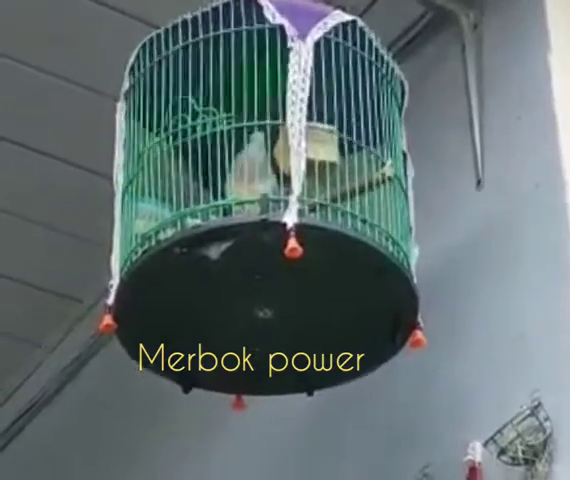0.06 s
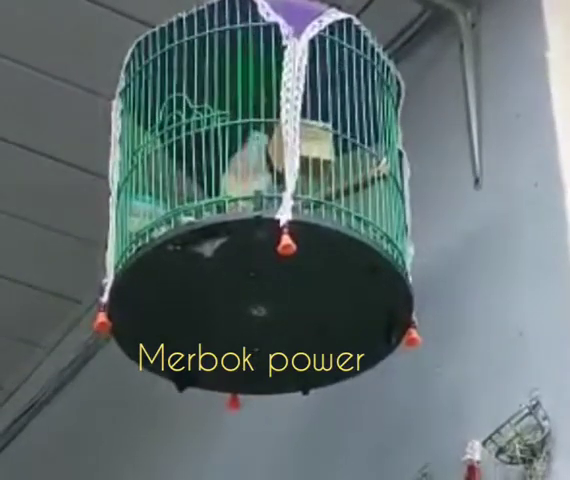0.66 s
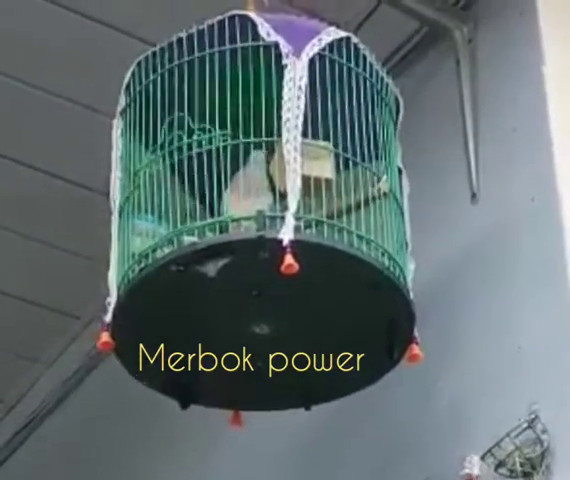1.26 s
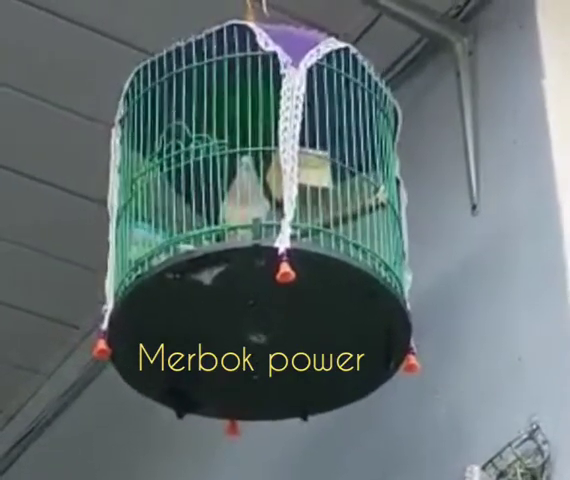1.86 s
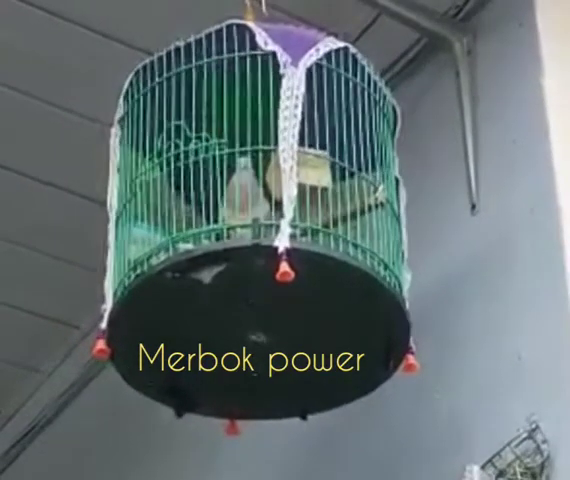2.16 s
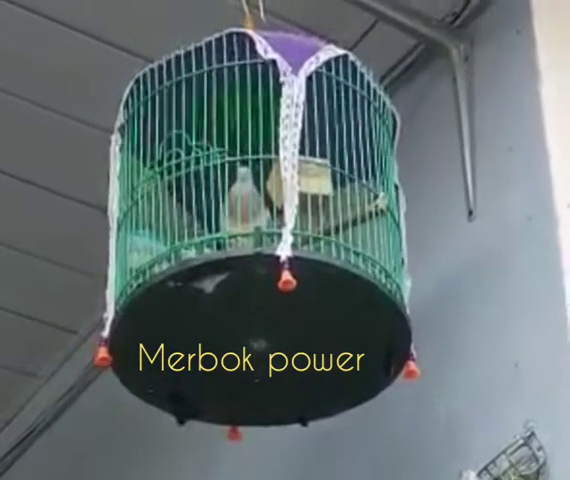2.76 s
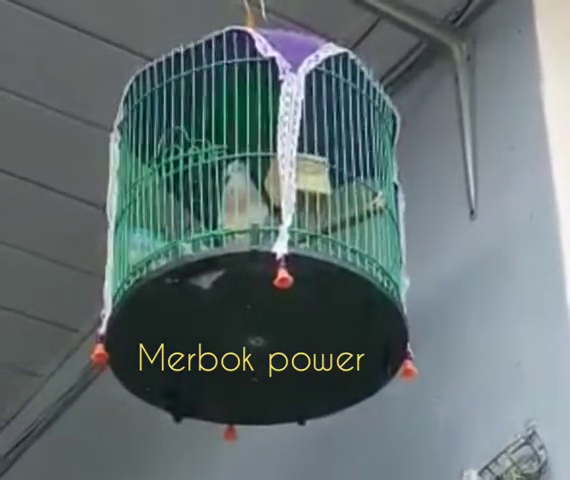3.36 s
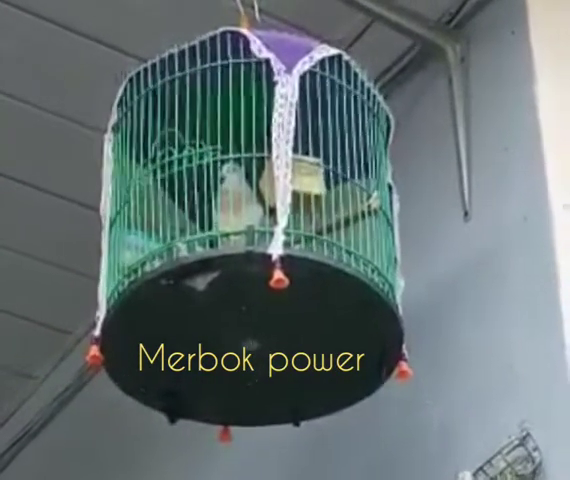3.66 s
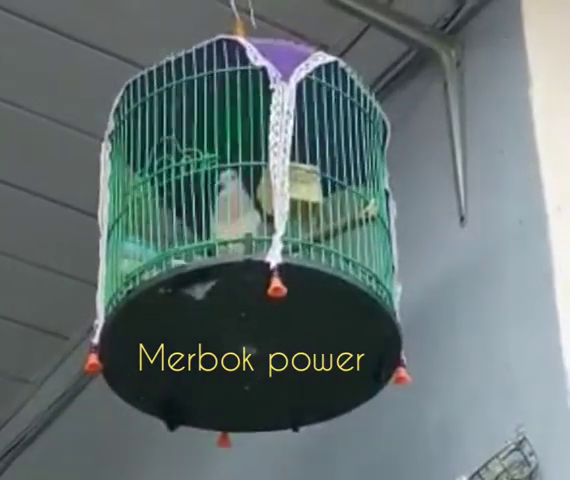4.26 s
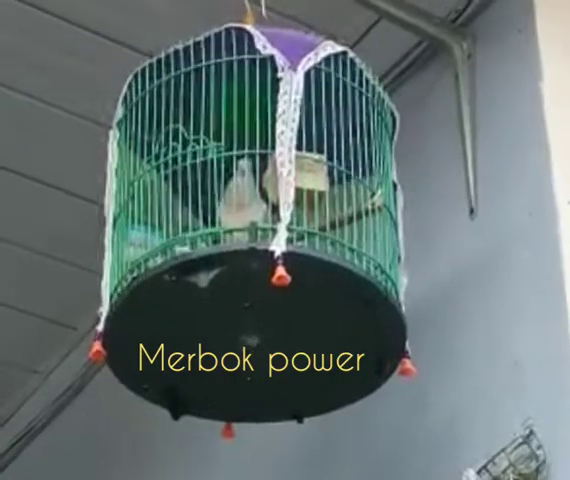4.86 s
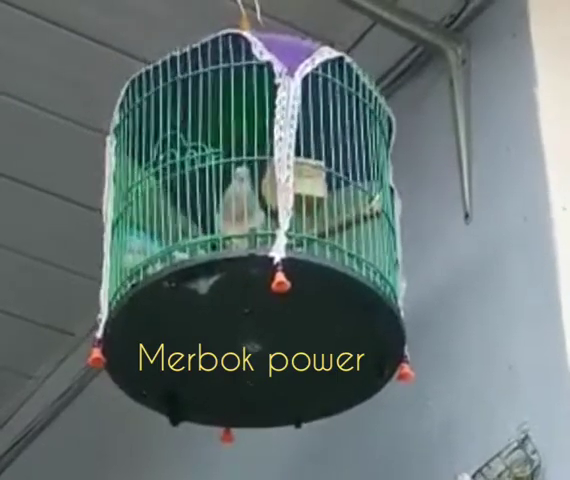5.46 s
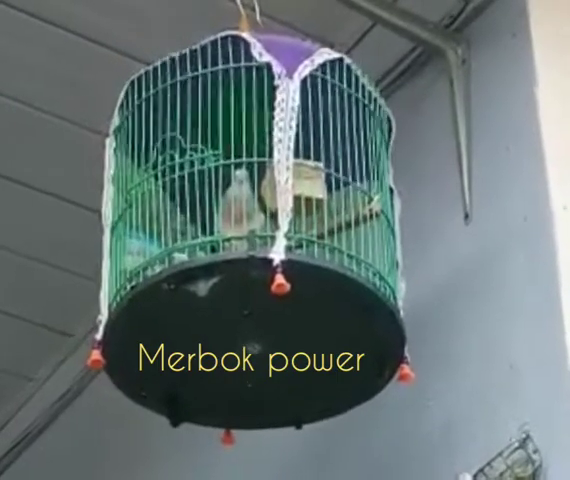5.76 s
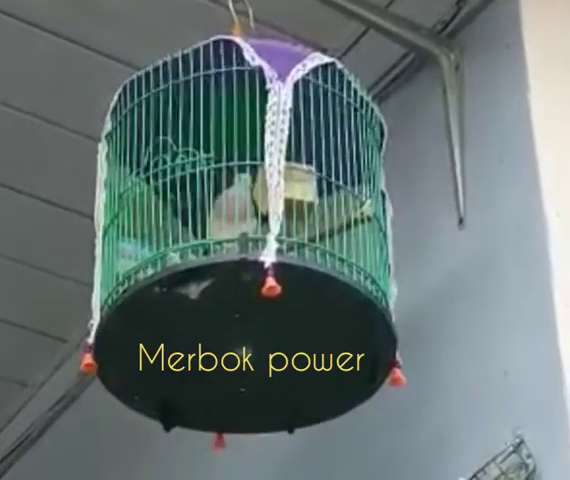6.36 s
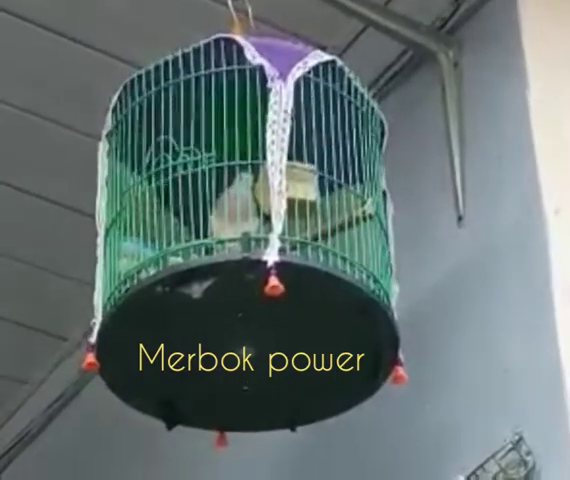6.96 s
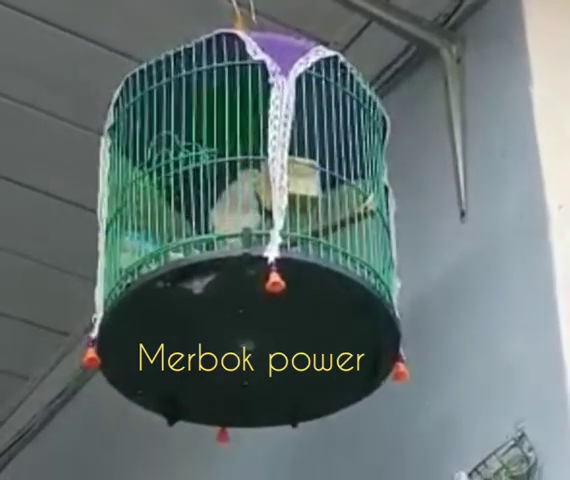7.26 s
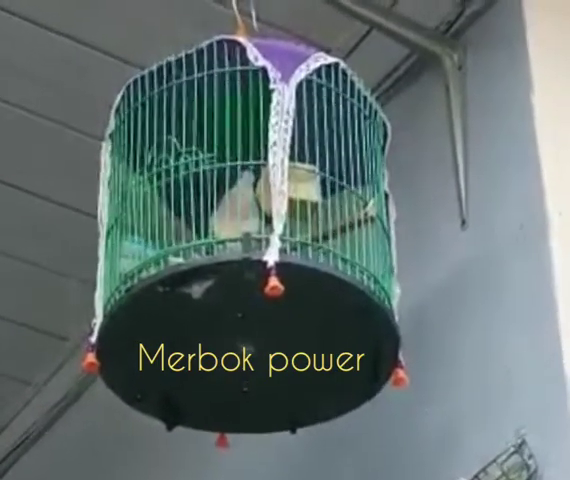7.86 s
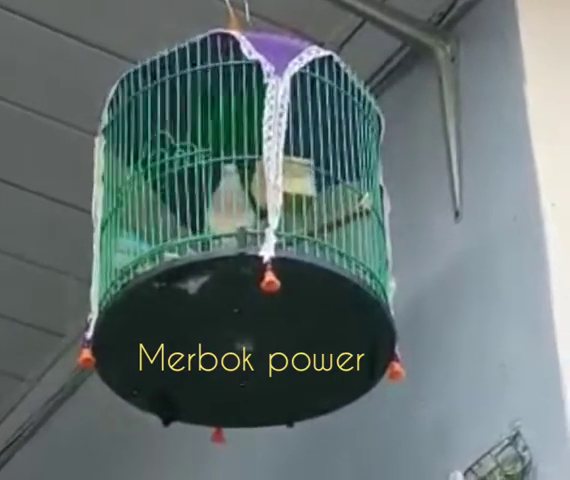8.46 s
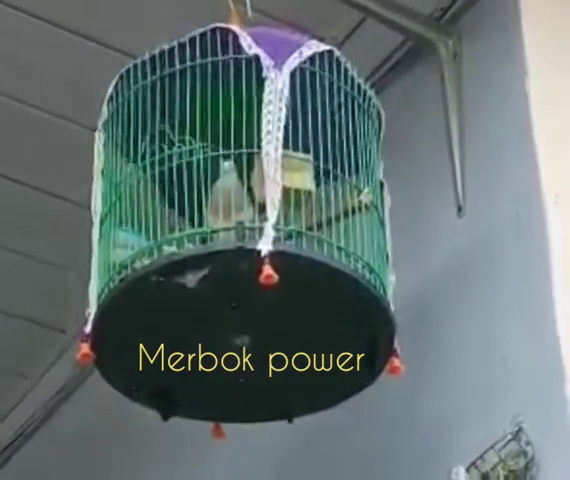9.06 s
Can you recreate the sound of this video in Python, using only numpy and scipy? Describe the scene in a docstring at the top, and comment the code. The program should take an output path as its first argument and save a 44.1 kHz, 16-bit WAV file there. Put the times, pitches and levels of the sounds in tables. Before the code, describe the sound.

A caged dove coos in quick stuttering phrases while other doves answer, with faint rising whistles and one sharp click.

```python
"""Zebra doves coo under a porch roof: one in a hanging cage close by, others answering around it.
Each coo swells in a low register, then sweeps up to a higher tone that sags and slides away;
faint overtones escape the closed beak. Small birds whistle thin rising notes and call hoarsely,
cages rustle and their bars ring with dry clicks. Behind them lie outdoor hiss, a receding
traffic rumble and the swelling hum of one far motor."""
import sys
import numpy as np
from scipy import signal
from scipy.fft import rfft, irfft
from scipy.io import wavfile

SR = 44100
rng = np.random.default_rng(int(sys.argv[2]) if len(sys.argv) > 2 else 0)


def generate_wav(sig):
    """Save sig (samples, or channels by samples) to the path in sys.argv[1] as 16-bit PCM at SR."""
    pcm = np.round(np.clip(np.atleast_2d(sig).T, -1, 1) * 32767).astype(np.int16)
    wavfile.write(sys.argv[1], SR, pcm)


N = 406161
TIME, FREQS = np.arange(N) / SR, np.fft.rfftfreq(N, 1 / SR)


def amp(db):
    """Decibels to gain."""
    return 10 ** (np.asarray(db) / 20)


def unit(x):
    """Scales to rms 1."""
    return x / np.sqrt(np.mean(x ** 2) + 1e-20)


def read(points, hz):
    """Reads a curve on a log-frequency axis."""
    f, value = np.transpose(points)
    return np.interp(np.log(hz + 1), np.log(f + 1), value)


def add(mix, s, sound):
    """Mixes a sound in at time s."""
    part = mix[max(round(s * SR), 0):][:len(sound)]
    part += sound[:len(part)]


def noise(eq, size):
    """Noise shaped by an EQ curve."""
    gain = amp(read(eq, np.fft.rfftfreq(size, 1 / SR)))
    return unit(irfft(rfft(rng.standard_normal(size)) * gain, size))


def band(hz, width_hz, size):
    """Noise in one resonance; centred on zero it is a slow random drift."""
    detune = 2 * (np.fft.rfftfreq(size, 1 / SR) - hz) / width_hz
    return unit(irfft(rfft(rng.standard_normal(size)) / np.sqrt(1 + detune ** 4), size))


def placed(x, pan_db, bearing=20):
    """Pans a source: bearing degrees to the left, it reaches that side sooner; pan_db is L minus R."""
    lag_s = .13 * np.sin(np.radians(bearing)) / 343
    delays = np.exp(1j * np.pi * lag_s * np.outer([1, -1], FREQS))
    return irfft(rfft(x) * delays, N) * amp([[pan_db / 2], [-pan_db / 2]])


# Stereo image of the beds: (frequency [Hz], left-right correlation [-1..1])
BED_CORRELATION = [(30, 0.98), (120, 0.9), (300, 0.8), (700, 0.56), (2000, -0.0069), (5000, -0.11),
                   (14000, 0.12)]
def wide(eq):
    """Diffuse stereo noise, nearly mono in the bass."""
    same = read(BED_CORRELATION, FREQS)
    left, other = noise(eq, N), noise(eq, N)
    return np.array([left, irfft(same * rfft(left) + np.sqrt(1 - same ** 2) * rfft(other), N)])


# Reverb decay: (frequency [Hz], t60 [s])
PORCH_DECAY = [(200, 0.95), (1000, 0.47), (4000, 0.3), (12000, 0.2)]
def porch(x, correlation=.3, predelay_s=.0043, clump_db=3):
    """Clumped reflections from roof and walls, each band dying at its own speed."""
    taps = rng.standard_normal((2, SR)) * (np.arange(SR) > predelay_s * SR)
    taps *= amp(clump_db * band(0, 160, SR))
    taps[1] = correlation * taps[0] + np.sqrt(1 - correlation ** 2) * taps[1]
    hz, t, bands = signal.stft(taps, SR, nperseg=256)
    tail = signal.istft(bands * amp(-60 * t / read(PORCH_DECAY, hz)[:, None]), SR, nperseg=256)[1]
    return signal.fftconvolve(x[None], tail / np.linalg.norm(tail[0]), axes=1)[:, :N]


# Air bed EQ: (frequency [Hz], gain [dB])
AIR_EQ = [(25, -6), (113, -2.5), (160, -10), (380, -10.5), (650, -10), (1150, -7.5), (1600, -14.5),
          (4600, -18.5), (5700, -25), (7300, -25), (8500, -31), (11000, -30), (13000, -41.5),
          (15500, -50.5)]
# Air bed pan: (frequency [Hz], left minus right [dB])
AIR_PAN = [(60, -1), (110, -0.5), (200, -0.5), (380, 1.5), (700, 0.5), (1290, -3), (2380, -4.0),
           (4400, -3.5), (8120, -2), (15000, 0.5)]
def outdoor_air(level_db=-55, drift_db=1.5):
    """A wide bed of hiss whose level wavers."""
    balance = amp(np.outer([.5, -.5], read(AIR_PAN, FREQS)))
    return amp(level_db + drift_db * band(0, 12, N)) * irfft(rfft(wide(AIR_EQ)) * balance, N)


# Traffic EQ: (frequency [Hz], gain [dB])
RUMBLE_EQ = [(25, -9.5), (50, 1), (75, 4.5), (130, 1), (200, -3), (330, -7.5), (500, -52), (900, -42.5)]
# Motor harmonics from the first up: (relative level [dB])
MOTOR_HARMONICS = [-4.5, 0, -24.5, -16.5, -19.5]
# Motor revs: (peak time [s], length [s], firing rate [Hz], glide [Hz/s], level [dB])
MOTOR_REVS = [(0.016, 0.44, 89.2, -19, -52), (1.15, 1.68, 73.77, 15, -50), (4.898, 1.4, 54.8, 3, -59),
              (6.281, 0.39, 56.9, -6.5, -50.5), (7.101, 1.02, 57.17, 7.5, -53.5),
              (8.033, 0.27, 66.2, 8, -51), (8.55, 0.53, 70.46, 3.5, -45.5)]
def traffic(start_db=-53.5, fade_db_per_s=1, rev_rumble_db=-6, waver=.012):
    """Slowly receding rumble and one far motor, whose revs swell both its hum and the rumble."""
    hum, swells = np.zeros((2, N))
    for s, length, firing_hz, glide, db in MOTOR_REVS:
        swell = amp(db) * np.exp(-(2 * (TIME - s) / length) ** 2)
        hz = (firing_hz + glide * (TIME - s)) * (1 + waver * band(0, 12, N))
        phase = 2 * np.pi * np.cumsum(hz) / SR
        hum += swell * unit(sum(amp(h) * np.sin(k * phase) for k, h in enumerate(MOTOR_HARMONICS, 1)))
        swells += swell
    rumble_gain = np.hypot(amp(start_db - fade_db_per_s * TIME), amp(rev_rumble_db) * swells)
    return hum + rumble_gain * wide(RUMBLE_EQ)


# Rustle EQ: (frequency [Hz], gain [dB])
RUSTLE_EQ = [(1000, 3.5), (2000, -1), (3700, 0), (5500, -3), (7200, -5), (8500, -8.5), (10800, -6.5),
             (13000, -15.5), (15500, -30.5)]
# Rustle cues: (time [s], length [s], rustle level [dB], thump level [dB])
RUSTLE_CUES = [(2.219, 0.05, -44.5, -73), (2.303, 0.025, -42.5, -78.5), (2.326, 0.039, -33.5, -44.5),
               (2.383, 0.063, -47, -47), (4.632, 0.062, -54.5, -72), (4.783, 0.095, -46.5, -52.5),
               (2.996, 0.16, -56, -60), (8.29, 0.12, -63, -74)]
def cage_rustles(grain_db=3, attack_share=.12, reverb_db=-3, thump_reverb_db=-6.5):
    """Grainy rustles in the cages, each over a soft low thump."""
    rustles, thumps = np.zeros((2, N))
    t = TIME[:SR // 2]
    for s, length, db, thump_db in RUSTLE_CUES:
        envelope = np.minimum(t / (attack_share * length), 1) * np.exp(-(t / length) ** 2)
        grains = unit(noise(RUSTLE_EQ, len(t)) * amp(grain_db * band(0, 870, len(t))))
        add(rustles, s, envelope * amp(db) * grains)
        add(thumps, s, envelope * amp(thump_db) * band(310, 200, len(t)))
    low_end = thumps + amp(thump_reverb_db) * porch(thumps)
    return low_end + placed(rustles + amp(reverb_db) * porch(rustles), pan_db=-3, bearing=56)


# EQ of the dry transient: (frequency [Hz], gain [dB])
CRACK_EQ = [(400, -22), (1500, -10), (2600, -9.5), (4100, 6.5), (5500, 0.5), (8500, -8), (13000, -9.5),
            (15500, -22.5)]
# Cage bar modes: (frequency [Hz], relative level [dB], t60 [s])
BAR_MODES = [(2830, -16.5, .029), (4030, -2, .022), (4120, -2, 0.028), (4226, -4, 0.02),
             (4980, -4.5, 0.035), (7130, -7, 0.024), (10000, -15, .008), (11700, -17.5, .01)]
# Click cues: (time [s], level [dB], tilt of the ring [dB/octave])
CLICK_CUES = [(.845, -48, 12), (2.304, -39, 7.5), (2.909, -50.5, 18), (2.923, -42, 16), (3.272, -53, -20),
              (4.701, -61, 21), (5.851, -56, 13), (5.936, -24.5, -3), (6.090, -46.5, 15.5), (6.094, -46, 6),
              (6.101, -50, 1), (6.405, -64, 24), (8.217, -51.5, 9)]
def cage_clicks(ticks_per_s=4, tick_db=-63, spread_db=4.5, crack_t60=.014, reverb_db=-7):
    """Dry clicks ring the bars, with faint random ticks as the birds shift their feet."""
    out, t = np.zeros(N), TIME[:SR // 2]
    draws = rng.random((int(ticks_per_s * N / SR), 3))
    ticks = [(when * N / SR, tick_db + spread_db * (2 * force - 1), 10 * bright)
             for when, force, bright in draws]
    for s, db, tilt in CLICK_CUES + ticks:
        click = noise(CRACK_EQ, len(t)) * amp(-60 * t / crack_t60)
        for hz, mode_db, t60 in BAR_MODES:
            detuned_hz = hz * rng.uniform(.95, 1.03)  # no two bars alike
            ring = np.sin(2 * np.pi * (detuned_hz * t + rng.random())) * amp(-60 * t / t60)
            click += amp(mode_db + tilt * np.log2(hz / 4000)) * ring
        add(out, s, amp(db) * click * np.minimum(t / .002, 1))
    return placed(out + amp(reverb_db) * porch(out), pan_db=-6, bearing=56)


# Squawk automation: (time [s], pitch [Hz], level [dB], roughness [0..1])
SQUAWK_CURVES = [(8.87, 597, -47.5, 0.8), (8.915, 715, -38.5, 0.7), (8.945, 896, -47.5, 0.6),
                 (8.97, 960, -49.5, 0.17), (9.0, 1010, -44, 0.1), (9.02, 1100, -56, 0),
                 (9.035, 1094, -63, 0.3)]
# Squawk harmonics from the second up: (relative level [dB])
SQUAWK_HARMONICS = [10, -9, -22, -22, -16, -19.5, -14.5]
# Short call cues: (time [s], length [s], centre [Hz], bandwidth [Hz], level [dB])
# The cue at 8.657 s is a brief breathy coo-like note near 1060 Hz.
SHORT_CALL_CUES = [(0.973, 0.13, 2940, 700, -56), (1.222, 0.086, 2140, 404, -51.5),
                   (3.116, 0.11, 3560, 1100, -52.5), (3.727, 0.074, 1500, 900, -51.5),
                   (0.905, 0.067, 755, 100, -58), (1.296, 0.063, 705, 140, -53.5),
                   (3.417, 0.082, 690, 89.5, -56), (3.717, 0.084, 398, 138, -58.5),
                   (8.082, 0.14, 1810, 495, -59.5), (8.608, 0.058, 1720, 350, -55.5),
                   (8.657, 0.067, 1064, 118, -43.5), (9.056, 0.033, 1270, 304, -40),
                   (9.125, 0.036, 1165, 456, -36.5)]
def hoarse_calls(jitter=.087, reverb_db=-6):
    """A squawk that clears as it rises, and short breathy calls farther off."""
    out = np.zeros(N)
    times, *lanes = np.transpose(SQUAWK_CURVES)
    t = np.arange(times[0], times[-1], 1 / SR)
    hz, db, rough = (np.interp(t, times, lane) for lane in lanes)
    phase = 2 * np.pi * np.cumsum(hz * (1 + jitter * rough * band(0, 500, len(t)))) / SR
    squawk = unit(sum(amp(h) * np.sin(k * phase) for k, h in enumerate(SQUAWK_HARMONICS, 2)))
    add(out, times[0], amp(db) * squawk)
    for s, length, hz, width, db in SHORT_CALL_CUES:
        size = int(length * SR)
        add(out, s, amp(db) * band(hz, width, size) * signal.windows.tukey(size, .7))
    return placed(out + amp(reverb_db) * porch(out), pan_db=-6)


# Whistle cues: (time [s], length [s], start [Hz], top [Hz], glide curve [exponent, under 1 rises early],
# vibrato [share of pitch], end drop [share of pitch], loudest at [share of climb], pre-trim level [dB])
WHISTLE_CUES = [(0, 0.074, 4800, 4980, 1.6, .0042, .022, 1, -57.5),
                (1.346, .755, 3716, 5336, 0.66, 0.0062, 0.081, 0.79, -56.5),
                (1.776, 0.19, 3800, 4290, .9, 0.0042, .075, 0.94, -60.5),
                (4.221, .37, 3880, 4940, 1, .013, .03, 0.7, -58),
                (6.09, .37, 4270, 5140, 1.26, .012, .01, 1, -67),
                (6.237, 1.11, 3462, 5010, 1.14, 0.0072, .05, 1, -57),
                (6.98, .62, 3880, 5750, 1, .024, .02, 0.66, -57),
                (7.25, 0.66, 3960, 5400, 0.78, 0.007, 0.059, 1, -57.5),
                (7.286, .12, 4400, 4630, .94, .005, .011, 1, -58)]
def whistles(drop_s=.06, vibrato_hz=8, swell_db=8.5, flutter_db=4.5, trim_db=-4, reverb_db=-4):
    """Thin, nearly pure glides of small birds: each climbs, swells and wavers more, then drops off."""
    out = np.zeros(N)
    for s, length, start_hz, top_hz, curve, depth, drop_share, loudest, db in WHISTLE_CUES:
        t = np.arange(0, length, 1 / SR)
        climb = np.minimum(t / max(length - drop_s, length / 2), 1)
        drop = np.clip(1 - (length - t) / drop_s, 0, 1)
        hz = (start_hz + (top_hz - start_hz) * climb ** curve) * (1 - drop_share * drop ** 2)
        jitter = .004 * band(0, 70, len(t))
        wander = .011 * climb * band(6, 10, 2 * SR)[:len(t)]
        vibrato = depth * np.sqrt(climb) * np.sin(2 * np.pi * (vibrato_hz * t + rng.random()))
        phase = 2 * np.pi * np.cumsum(hz * (1 + jitter + wander + vibrato)) / SR
        tone = np.sin(phase) + amp(-26.5) * np.sin(2 * phase)
        shape_db = flutter_db * band(0, 46, len(t)) - swell_db * (1 - climb / loudest) ** 2
        add(out, s, amp(db + trim_db + shape_db) * signal.windows.tukey(len(t), .1) * tone)
    return placed(out + amp(reverb_db) * porch(out), pan_db=-10, bearing=0)


# Voice presets: (scoop pitch [Hz], scoop rise [share of pitch], scoop swell [dB], upward sweep [s],
# tone sag [Hz], long-note slide [Hz], slide time [s], long-note fade [dB])
DOVE_VOICES = {"near": (855, .06, 4.1, 0.0045, 28.4, 170, .03, 4.5),
               "deep": (858, 0.058, 10.1, 0.0042, 42.1, 79, 0.046, 4.3),
               "bright": (965, .13, 9, .003, 49.6, 138.6, 0.0706, 4),
               "soft": (891, 0.02, 0.5, 0.01, 26, 141.5, 0.04, -0.5),
               "high": (1200, 0.24, 3, 0.0028, 40, 25, 0.013, 1),
               "plain": (1058, .02, 3, .01, 3.5, 3.5, .04, 0),
               "low": (840, 0.018, 6.6, .01, 35, 16, 0.033, 2.5),
               "far": (1230, .06, 6, .005, 22, 30, 0.036, 3)}
# Pitch waver per voice: (rms depth [Hz])
DOVE_WAVER = {"near": 6, "deep": 9, "bright": 13, "soft": 9, "high": 24, "plain": 3, "low": 24, "far": 30}
# Standing waves at each perch lift or swallow a passing glide: (centre [Hz], width [Hz], gain [dB])
STANDING_WAVES = {"near": (915, 76, 5.4), "deep": (878, 36, 2.4), "bright": (1140, 26, -7.5),
                  "soft": (1022, 10, 2.65), "high": (1365, 40, 0.85), "plain": (1060, 30, 0),
                  "low": (848, 42, 0.92), "far": (1270, 50, 0)}
# Overtones that escape the closed beak: (multiple of the pitch [ratio])
BEAK_OVERTONES = [2, 3, 4, 5, 6, 10]
# Throat colour on those overtones: (frequency [Hz], gain [dB])
THROAT_EQ = [(1750, -42.5), (2050, -36.5), (2250, -51), (2800, -52.5), (3080, -38.5), (3280, -55),
             (4300, -56), (5300, -62.5), (5900, -49), (6450, -48), (7000, -59), (10800, -59.5)]
# Husk around a scoop at 846 Hz, transposed for each voice: (frequency [Hz], gain [dB])
HUSK_EQ = [(480, -50.5), (660, -19), (790, 1), (900, -3), (1150, -52.5), (3000, -100)]
def coo(voice, note, overtones_db, sixth_db, attack_s=.01, release_s=.016, long_s=.12, husk_db=-19.5):
    """One glide: a low scoop swells, the voice flips up to a tone, sags, and slides down as it closes."""
    scoop_s, scoop_db, tone_s, tone_hz, tone_db = note
    scoop_hz, rise, swell_db, sweep_s, sag_hz, slide_hz, slide_s, fade_db = DOVE_VOICES[voice]
    node_hz, node_width_hz, node_db = STANDING_WAVES[voice]
    t = np.arange(-scoop_s, tone_s + release_s, 1 / SR)  # zero at the flip
    through_scoop, through_tone = np.minimum(1 + t / scoop_s, 1), np.clip(t / tone_s, 0, 1)
    upper = .5 + .5 * np.tanh(t / sweep_s)  # crossfade between registers
    spent = min(tone_s / long_s, 1) ** 2  # a long note runs out of air: it fades and slides in full
    slide = np.clip(1 + (t - tone_s - release_s / 2) / min(slide_s, tone_s), 0, 1) ** 2
    low_hz = scoop_hz * (1 + rise * (through_scoop - .5))
    high_hz = tone_hz - sag_hz * through_tone - slide_hz * (.15 + .85 * spent) * slide
    hz = (1 - upper) * low_hz + upper * high_hz
    low_db = scoop_db - swell_db * (1 - through_scoop)
    high_db = tone_db - fade_db * spent * through_tone ** 2
    envelope = np.sqrt(2) * amp((1 - upper) * low_db + upper * high_db)
    envelope *= np.sin(np.pi / 2 * np.minimum((t + scoop_s) / attack_s, 1)) ** 2
    envelope *= np.sin(np.pi / 2 * np.minimum((t[-1] - t) / release_s, 1)) ** 2
    lift_db = node_db / (1 + (2 * (hz - node_hz) / node_width_hz) ** 2)
    flutter_db = 1.1 * band(0, 100, len(t))
    phase = 2 * np.pi * np.cumsum(hz + DOVE_WAVER[voice] * band(0, 160, len(t))) / SR
    overtones = sum(amp(read(THROAT_EQ, k * hz) + overtones_db + sixth_db * (k == 6)) * np.sin(k * phase)
                    for k in BEAK_OVERTONES)
    husk = amp(husk_db) * (1 - upper) * noise(np.multiply(HUSK_EQ, [scoop_hz / 846, 1]), len(t))
    shimmer = amp(3 * band(0, 83, len(t)))
    return envelope * (amp(lift_db + flutter_db) * np.sin(phase) + shimmer * overtones + husk)


# Mix per voice: (left minus right [dB], reverb send [dB], overtone trim [dB], # sixth-partial trim [dB], shift
# per copy [s; negative leaves the copies unshifted, on the song])
VOICE_MIX = {"near": (-1.6, -6, 0, -0.5, 0.22), "deep": (2.5, -4.5, -0.5, 11, -0.07),
             "bright": (-0.11, -0.87, -1.5, 0, .021), "soft": (1.2, 1.5, -8, 0, 0.26),
             "high": (-2.5, 2.5, -23, -0.5, -0.6), "plain": (-2.5, -10, -11, 1, 0.04),
             "low": (0, 7, -21.5, 0, 0.5), "far": (0, 6.5, -18, 2, -1.5)}
# Direction per voice: (angle to the left [degrees])
VOICE_BEARINGS = {"near": 56, "deep": 7, "bright": -12, "soft": 15, "high": -8, "plain": -20, "low": 10,
                  "far": 0}
# Note cues per voice: (time of the register flip [s], scoop length [s], scoop level [dB],
# tone length [s], tone pitch [Hz], tone level [dB])
# "low" at 5.179 s is a low lingering ring after the last coo of the deep dove's phrase;
# "plain" at 5.790 s is a held level tone continuing the near dove's short coo.
NOTE_CUES = { "near": [(2.166, 0.031, -18.5, 0.11, 1103, -19), (2.364, 0.029, -18.5, 0.023, 1000, -27.5),
             (2.461, .028, -20.5, 0.022, 1004, -28.5), (2.557, .028, -19, 0.022, 1034, -25),
             (2.675, 0.029, -20.5, 0.085, 1029, -23), (5.355, .006, -44, 0.02, 1140, -31),
             (5.397, .03, -20.5, .14, 1098, -20), (5.579, 0.027, -20.5, 0.019, 1005, -28),
             (5.675, 0.027, -20.5, 0.02, 1019, -28.5), (5.771, .028, -20, .024, 1035, -26),
             (5.887, .026, -20.5, 0.088, 1034, -22.5), (8.788, 0.035, -21, .14, 1097, -20),
             (8.967, 0.022, -18.5, 0.058, 1035, -22), (9.058, .026, -20, 0.019, 1025, -25.5),
             (9.154, 0.027, -20, 0.031, 1024, -25)], "deep": [(1.872, .058, -20, .12, 1038, -30),
             (2.012, .033, -22.5, 0.031, 946, -30.5), (2.084, 0.037, -30.5, .015, 886, -31.5),
             (2.297, 0.032, -21.5, 0.021, 1013, -20), (4.574, 0.077, -22.5, 0.11, 1005, -31.5),
             (4.705, .035, -24, 0.033, 920, -31), (4.783, 0.029, -24.5, 0.009, 870, -30.5),
             (4.896, 0.049, -23, 0.018, 896, -31), (5.025, 0.036, -23.5, .11, 959, -29.5),
             (7.706, .062, -21.5, .11, 1000, -30.5), (7.832, 0.04, -23.5, .019, 933, -30),
             (7.894, 0.029, -26, 0.0099, 900, -36.5), (7.992, .038, -24, 0.012, 907, -34),
             (8.108, 0.045, -22, 0.058, 926, -26.5)], "bright": [(3.808, 0.037, -27, 0.12, 1233, -25.5),
             (3.952, .03, -26.5, 0.053, 1173, -29), (4.043, 0.024, -23.5, 0.044, 1179, -32),
             (4.150, 0.028, -27, 0.18, 1173, -24), (4.492, .026, -29, .19, 1174, -27),
             (7.398, 0.027, -29, 0.13, 1213, -27.5), (7.535, .028, -30, .035, 1182, -31),
             (7.618, 0.024, -29, .04, 1172, -29), (7.745, 0.02, -31.5, 0.19, 1165, -27),
             (8.108, 0.027, -33, .165, 1172, -28.5)], "soft": [(.162, .024, -35.5, .065, 1060, -37.5),
             (.256, .012, -47, 0.17, 1061, -35.5), (6.112, .016, -26.5, .024, 1058, -35),
             (6.268, .016, -28, 0.019, 1073, -33.5), (6.433, .016, -29.5, 0.071, 1064, -36.5),
             (6.657, 0.019, -32, 0.25, 1044, -37.5), (6.925, .015, -44, 0.049, 989, -41)],
             "high": [(.361, 0.019, -37, .13, 1473, -40.5), (.503, 0.016, -37, 0.04, 1400, -37),
             (.590, 0.014, -39, 0.042, 1385, -37), (.688, .012, -43, 0.074, 1390, -36.5),
             (1.388, .02, -38, 0.078, 1459, -39.5), (1.485, 0.022, -41, 0.049, 1410, -38),
             (1.580, .02, -37.5, 0.04, 1398, -38), (1.671, .018, -39, .075, 1402, -38),
             (1.855, 0.019, -44, 0.068, 1395, -40), (2.520, 0.019, -43, 0.13, 1445, -44.5),
             (2.705, .018, -47.5, .05, 1384, -41.5), (2.810, .018, -46, 0.07, 1386, -38.5),
             (4.762, 0.017, -42, 0.12, 1450, -42), (4.888, .018, -42, 0.048, 1392, -39),
             (4.992, .018, -43, 0.037, 1370, -40.5), (5.098, 0.017, -39.5, 0.071, 1377, -38.5)],
             "plain": [(.005, 0.0055, -37, 0.04, 1047, -38.5), (.705, .028, -43, 0.11, 1087, -37.5),
             (1.001, 0.032, -44.5, .09, 1070, -40.5), (1.150, 0.049, -40.5, 0.047, 1064, -35.5),
             (1.383, .03, -38.5, 0.199, 1058, -37), (1.784, 0.031, -42, .057, 1052, -35.5),
             (5.790, .01, -39, 0.1, 1088, -28.5)], "low": [(5.179, .045, -40, .2, 833, -37.5),
             (8.58, .055, -34, .18, 873, -37.5)], "far": [(5.96, .022, -64, .1, 1287, -57),
             (6.31, .021, -62, 0.055, 1285, -59), (6.49, .02, -62, .05, 1270, -60),
             (6.83, .017, -62, .14, 1314, -57), (7.12, .02, -53, 0.26, 1263, -59)]}
def doves(copy_db=-14):
    """Doves sing from their perches; the farther one sits, the more the porch blurs it."""
    out = np.zeros((2, N))
    for voice, (pan_db, reverb_db, overtones_db, sixth_db, shift_s) in VOICE_MIX.items():
        song, copies = np.zeros((2, N))
        for flip_s, *note in NOTE_CUES[voice]:
            add(song, flip_s - note[0], coo(voice, note, overtones_db, sixth_db))
        for k in (1, 2):  # two fainter copies of the song, shifted later; with a negative shift they fall right on the song
            add(copies, k * shift_s, amp(k * copy_db) * song)
        send = amp(reverb_db)
        track = song + copies + send * porch(song)
        out += placed(track, pan_db, VOICE_BEARINGS[voice]) / np.hypot(1, send)
    return out


def scene():
    """Doves in front, other birds and cages around them, the street behind."""
    return doves() + whistles() + hoarse_calls() + cage_rustles() + cage_clicks() + outdoor_air() + traffic()


def record(dry):
    """A steep high cut at 15650 Hz on the master."""
    high_cut = signal.firwin(511, 15650, window=("kaiser", 9), fs=SR)
    return signal.oaconvolve(dry, high_cut[None], "same")


dry = scene()
out = record(dry)
generate_wav(out)
```